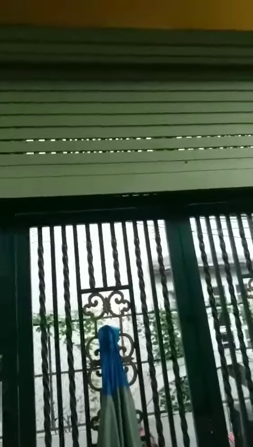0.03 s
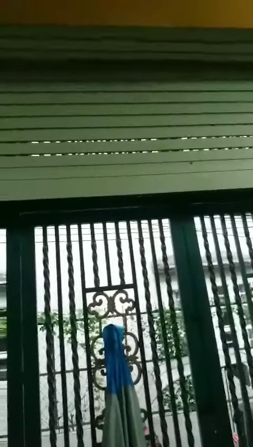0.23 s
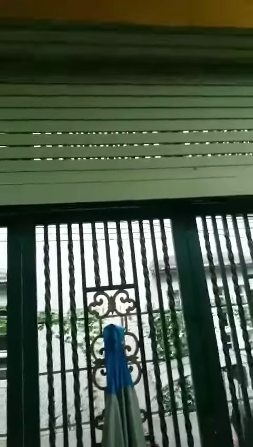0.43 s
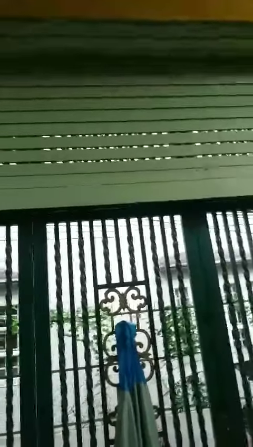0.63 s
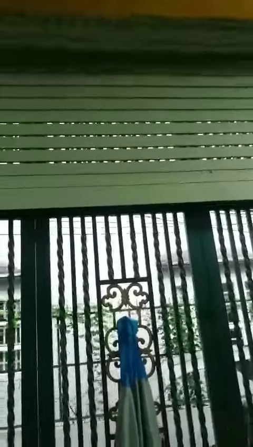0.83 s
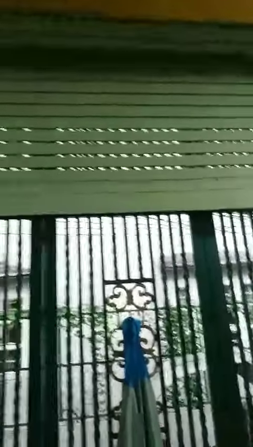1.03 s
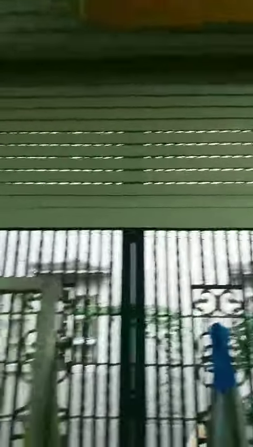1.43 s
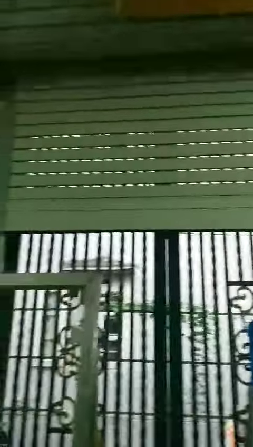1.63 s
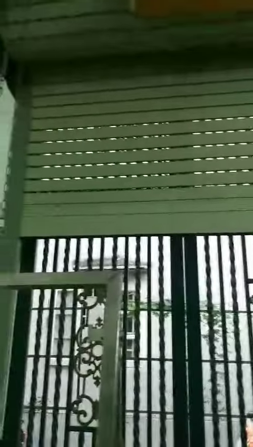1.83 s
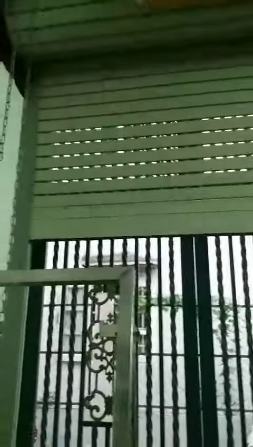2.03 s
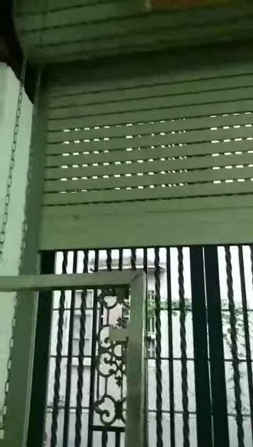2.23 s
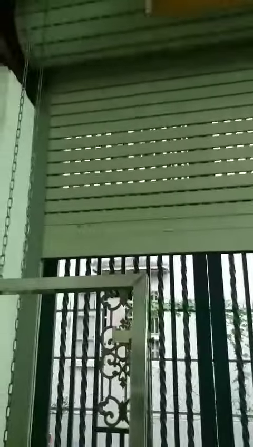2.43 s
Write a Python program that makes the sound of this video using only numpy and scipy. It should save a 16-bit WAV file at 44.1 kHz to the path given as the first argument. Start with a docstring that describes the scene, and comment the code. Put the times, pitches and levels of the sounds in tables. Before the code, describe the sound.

A motorized metal shutter clacks into motion and rattles upward over faint street traffic.

```python
"""A hard-walled entrance, heard on a closely spaced microphone pair near a metal roller shutter.
The motor drive engages with a loud clack that sets the steel ringing, and the shutter starts to rise.
The motor hums, loose metal chinks, and the slats knock and scrape ever louder in their guides,
so that the curtain booms and drones. A short room tail follows the hits.
Farther off, street noise comes in through the gate."""
import sys
import numpy as np
from scipy import signal
from scipy.fft import rfft, irfft
from scipy.io import wavfile
from scipy.ndimage import uniform_filter1d

SR = 44100
rng = np.random.default_rng(int(sys.argv[2]) if len(sys.argv) > 2 else 0)


def transcribe(signal):
    """Save signal, clipped to [-1, 1], as a 16-bit WAV file at the path in sys.argv[1]."""
    frames = np.atleast_2d(signal).T
    limited = np.clip(frames, -1, 1)
    pcm = np.round(limited * 32767).astype(np.int16)
    wavfile.write(sys.argv[1], SR, pcm)


N = 110250
TIME = np.arange(N) / SR

# the latch taps just before the drive engages: start_s, level_db
LATCH = [(.2294, -19.5)]
# spectrum of the tap: frequency_hz, density_db
LATCH_COLOUR = [(200, -14), (1500, -12), (2400, -4), (4100, 4), (5200, -12), (6500, -4), (9000, -21),
                (16000, -16)]
# blows of the drive engaging: start_s, level_db
BLOWS = [(.2418, -12), (.2485, -14), (.2555, -10), (.2645, -10.5), (.278, -11), (.287, -13.5),
         (.3015, -14.5)]
# spectrum of a blow: frequency_hz, density_db
BLOW_COLOUR = [(30, -50), (80, -42), (160, -14.5), (330, -14.5), (450, -14.5), (900, -12), (1650, -10.5),
               (1830, 1), (2090, -4), (2300, 0.5), (2700, -5), (3300, -9), (3750, -4.5), (4400, -6),
               (5000, -12), (7400, -12), (9800, -26.5), (14500, -24.5), (16000, -31)]
# ringing of the struck steel: pitch_hz, relative_db, t60_s
STEEL_MODES = [(952, -14.5, 0.42), (1537, -14, 0.56), (1806, -10, 0.19), (1816, -4, .24), (1913, -2, 0.26),
               (1954, -12, 0.25), (2217, -6, .18), (2262, 1, 0.15), (2340, -4, 0.21), (2383, -2.5, 0.23),
               (2803, -13, 0.26), (2855, -12, 0.52), (2947, -9, 0.29), (3720, -9, 0.33), (4180, -6, 0.22),
               (4330, -10, 0.22), (4360, -8.5, 0.46), (6160, -11, .3), (6970, -21, .28)]
# the curtain shudders under the blows: start_s, level_db
SHUDDER = [(.2555, -22), (.266, -28.5), (.287, -25.5)]
# spectrum of the shudder: frequency_hz, density_db
SHUDDER_COLOUR = [(60, -47), (150, -8), (260, -7), (340, 6), (450, -13), (650, -2.5), (1000, -12),
                  (2000, -13), (16000, -60)]
# loose parts rattle as they settle: start_s, level_db
RATTLES = [(.473, -31.5), (.512, -30.5)]
# spectrum of a rattle: frequency_hz, density_db
RATTLE_COLOUR = [(100, -21), (300, -5.5), (1300, -6), (1850, 1), (3500, 0), (4600, -3.5), (6000, -15),
                 (8600, -7), (10500, -19), (16000, -24)]
# ringing of those parts: pitch_hz, relative_db, t60_s
RATTLE_MODES = [(1825, -8, .25), (2370, -14, 0.21), (4520, -4, 0.15), (4800, -12, .35)]

# slats knock as they roll up: start_s, boom_db, boom_hz, clatter_db
KNOCKS = [(.52, -34.5, 202, -39.5), (1.256, -40, 183, -44), (1.291, -43.5, 183, -52),
          (1.325, -40.5, 186, -62), (1.364, -46, 183, -48), (1.484, -43, 200, -43), (1.56, -46, 192, -55),
          (1.637, -39, 193, -48), (1.6987, -32, 202, -43), (1.778, -35, 181, -37), (1.871, -40, 151, -40),
          (1.897, -34, 180, -51), (1.949, -32, 181, -38.5), (2.02, -28, 201, -33), (2.038, -36, 203, -34.5),
          (2.1083, -32, 199, -33), (2.134, -26.5, 189, -37), (2.183, -23, 192, -32.5),
          (2.207, -29, 201, -30), (2.237, -31, 207, -29.5), (2.299, -25.5, 213.4, -28),
          (2.314, -31, 217, -45), (2.34, -41, 217, -46), (2.391, -25, 210, -31), (2.459, -26, 215, -30),
          (2.483, -25, 215, -31.5)]
# spectrum of their clatter: frequency_hz, density_db
CLATTER_COLOUR = [(40, -36), (90, -31), (150, -7), (220, 9), (280, -7), (350, -3), (430, -3.5), (540, 7),
                  (800, -3.5), (1300, -1), (2200, -5.5), (4300, -18), (8000, -32), (16000, -45)]
# slats slide in the guides: time_s, level_db
SLIDE_LEVEL = [(0, -55), (1.3, -58), (1.42, -45.5), (1.52, -41), (1.64, -38), (1.87, -35.5), (2.05, -34.5),
               (2.16, -35.5), (2.22, -33.5), (2.28, -36.5), (2.35, -33.5), (2.43, -34.5), (2.5, -33.5)]
# spectrum of the friction: frequency_hz, density_db
SLIDE_COLOUR = [(25, -39), (50, -13), (75, -18), (115, -4), (172, -5.5), (215, -1), (280, -8.5),
                (360, -4.5), (430, -7.5), (700, -7.5), (1200, -9), (2000, -8), (3200, -10), (4400, -12.5),
                (6200, -18.5), (7900, -22.5), (8600, -18), (9600, -28), (16000, -31)]
# resonances of the sliding curtain: pitch_hz, relative_db
CURTAIN_MODES = [(172, -10), (214, -12), (345, -16), (368, -15.5), (438, -19), (521, -17), (590, -22),
                 (688, -19.5), (1203, -20.5)]
# slats catch on the guides: peak_s, level_db, width_s
SCRAPES = [(1.64, -37.5, 0.014), (1.881, -39, 0.019), (2.215, -41, 0.016), (2.348, -33, 0.017)]
# spectrum of a scrape: frequency_hz, density_db
SCRAPE_COLOUR = [(300, -16), (1000, -4), (2200, 1), (4200, 3), (6200, -7), (8600, -8), (10000, -22),
                 (16000, -26)]

# light ticks of the drive: start_s, level_db
TICKS = [(.5125, -44), (.8962, -38)]
# spectrum of a tick: frequency_hz, density_db
TICK_COLOUR = [(300, -30), (2500, -1), (4000, 2), (5500, 5), (9000, -4.5), (16000, -7)]
# chinks of loose metal: start_s, level_db, relative_ring_db
CHINKS = [(1.572, -37, -24), (1.579, -32.5, -20), (1.668, -34, -5), (1.677, -35.5, -4), (1.692, -41, -3)]
# spectrum of a chink: frequency_hz, density_db
CHINK_COLOUR = [(1000, -27), (5000, -2.5), (8500, 0.5), (12000, 4), (16000, 0)]
# ringing of the loose metal: pitch_hz, relative_db, t60_s
CHINK_MODES = [(10450, -2, .4), (10680, 0, 0.45), (10900, -8, .45), (11200, -6, .45), (11230, -8, .42)]
# mains hum of the motor: time_s, fundamental_db, octave_db
HUM_LEVEL = [(0, -54, -68.5), (.25, -56, -62), (.42, -61, -49), (.7, -66, -50), (1, -79, -51.5),
             (1.4, -62.5, -59), (2.5, -70, -52)]
# street noise through the gate: time_s, level_db
STREET_LEVEL = [(0, -41), (.07, -42.5), (.15, -39.5), (.22, -41.5), (.62, -41.5), (.83, -44), (1, -42),
                (1.15, -46), (1.35, -47), (2.5, -43.5)]
# spectrum of the street: frequency_hz, density_db
STREET_COLOUR = [(25, -31), (50, -5), (75, -22), (105, -3), (180, 2), (270, -2), (350, 2), (450, -4),
                 (620, 2), (800, -1.5), (1100, -1), (2000, -1.5), (3000, -3), (4500, -6), (6200, -11.5),
                 (8700, -14.5), (10000, -20.5), (16000, -21.5)]

# decay of the entrance: frequency_hz, t60_s
ROOM_DECAY = [(500, 0.64), (2200, 0.46), (12000, 0.47)]
# how alike the two microphones hear noise: frequency_hz, correlation
MIC_LIKENESS = [(60, 0.91), (200, 0.94), (400, 0.92), (800, 0.44), (2000, 0.23), (6000, 0.1), (16000, 0.2)]
# colour difference between the microphones: frequency_hz, left_minus_right_db
MIC_BALANCE = [(60, -3), (300, -3.5), (800, -3), (1300, -3.5), (2400, 0.5), (4400, 3.5), (6500, -0.5),
               (9000, 8.5), (12000, 2), (16000, -1)]
LEFT_LAG_S = .00018


def drive_clack(steel_db=-10, pan_db=0.4):
    """The drive engages: a tap, a volley of steel blows that shakes the curtain, two weak rattles."""
    tap = hits(LATCH, LATCH_COLOUR, t60_s=0.041, room_db=-9, grain_db=-1.5)
    blows = hits(BLOWS, BLOW_COLOUR, t60_s=0.079, room_db=-9.5, grain_db=1)
    steel = amp(steel_db) * ring(BLOWS, STEEL_MODES)
    shudder = hits(SHUDDER, SHUDDER_COLOUR, t60_s=0.13, room_db=-8.5, grain_db=3.5)
    rattles = hits(RATTLES, RATTLE_COLOUR, t60_s=0.16, room_db=-4.5, grain_db=1.5)
    rattles += ring(RATTLES, RATTLE_MODES)
    return (tap + blows + steel + shudder + rattles) * amp([[pan_db / 2], [-pan_db / 2]])


def slat_knocks(rise_s=0.0036, boom_t60_s=.11, boom_gain_db=3):
    """Each knock makes the curtain clatter and boom; the boom sits midway between the microphones."""
    booms, t = np.zeros((2, N)), TIME[:SR // 2]
    for start_s, boom_db, hz, _ in KNOCKS:
        envelope = (1 - np.exp(-t / rise_s)) * amp(boom_gain_db + boom_db - 60 * t / boom_t60_s)
        boom = envelope * np.sin(2 * np.pi * hz * t)
        add(booms, start_s, np.array([boom, boom]))
    clatters = [(s, db) for s, _, _, db in KNOCKS]
    return booms + hits(clatters, CLATTER_COLOUR, t60_s=0.15, room_db=-8.5, grain_db=3)


def guide_friction(mode_width_hz=9):
    """Steady friction in the guides sets the curtain droning; now and then a slat catches."""
    drone = 0
    for hz, db in CURTAIN_MODES:
        angle = 2 * np.pi * hz * TIME
        drone += amp(db) * (wander(mode_width_hz) * np.sin(angle) + wander(mode_width_hz) * np.cos(angle))
    sliding = (noise(SLIDE_COLOUR, grain_db=1.5) + drone) * level(SLIDE_LEVEL)
    catches = sum(amp(db) * np.exp(-((TIME - s) / width_s) ** 2 / 2) for s, db, width_s in SCRAPES)
    return sliding + catches * noise(SCRAPE_COLOUR, grain_db=1.5)


def loose_metal():
    """Light ticks and bright, ringing chinks as the slack is taken up."""
    ticks = hits(TICKS, TICK_COLOUR, t60_s=0.049, room_db=-3.5, grain_db=2)
    chinks = hits([(s, db) for s, db, _ in CHINKS], CHINK_COLOUR, t60_s=0.071, room_db=-3, grain_db=-3)
    ringing = ring([(s, db + ring_db) for s, db, ring_db in CHINKS], CHINK_MODES)
    return ticks + chinks + ringing


def motor(hum_hz=100.5, waver_rad=0.38, waver_db=3.5):
    """Wavering mains hum, whose octave takes over once the motor runs."""
    angle = 2 * np.pi * hum_hz * TIME + waver_rad * wander(rate_hz=7.9)
    hum = level(HUM_LEVEL, column=1) * np.sin(angle) + level(HUM_LEVEL, column=2) * np.sin(2 * angle)
    return np.sqrt(2) * hum * unit(amp(waver_db * wander(rate_hz=30)))


def street():
    """A steady wash of traffic from beyond the gate."""
    return noise(STREET_COLOUR) * level(STREET_LEVEL) * grain(depth_db=0.38, samples=600)


def hits(events, colour, t60_s, room_db, grain_db, room_build_s=0.0082):
    """Short rattling bursts, then the room's tail, which dies at its own speed in each band."""
    power = strikes(events) ** 2
    out = noise(colour, grain_db) * decay(power, t60_s)
    pole = np.exp(-1 / (room_build_s * SR))
    room_power = signal.lfilter([1 - pole], [1, -pole], power)
    wash, hz = rfft(noise(colour)), np.fft.rfftfreq(N, 1 / SR)
    centres_hz, room_t60s = np.transpose(ROOM_DECAY)
    for share, room_t60_s in zip(np.eye(len(room_t60s)), room_t60s):
        band = irfft(wash * np.interp(hz, centres_hz, share), N)
        out += amp(room_db) * band * decay(room_power, room_t60_s)
    return out


def ring(events, modes, wander_rad=.5):
    """Dying partials fed by every blow; their phase wanders, and differs between the microphones."""
    first = round(events[0][0] * SR)
    power = strikes(events)[first - 1:first + SR * 2 // 3] ** 2
    t, out = TIME[:len(power)], np.zeros((2, N))
    for hz, db, t60_s in modes:
        phase = 2 * np.pi * hz * t + wander_rad * wander(rate_hz=71.4)[:len(t)]
        lag_rad = 2 * np.pi * hz * LEFT_LAG_S / 4 + rng.uniform(0, 1)
        add(out, (first - 1) / SR, amp(db) * decay(power, t60_s) * np.sin([phase - lag_rad, phase]))
    return out


def noise(colour, grain_db=0):
    """Coloured noise of rms 1 at the microphone pair; grain makes it chatter."""
    hz = np.fft.rfftfreq(N, 1 / SR)
    common, separate = rfft(rng.standard_normal((2, N)) * grain(grain_db))
    likeness = np.clip(curve(MIC_LIKENESS, hz), 0, 1)
    left = common * np.exp(-2j * np.pi * hz * LEFT_LAG_S)
    right = likeness * common + np.sqrt(1 - likeness ** 2) * separate
    return unit(irfft(np.array([left, right]) * amp(curve(colour, hz)), N))


def grain(depth_db, samples=40):
    """Random gain that wavers over about this many samples."""
    return unit(amp(depth_db * unit(uniform_filter1d(rng.standard_normal(N), samples))))


def wander(rate_hz):
    """Random drift of rms 1 that turns about rate_hz times a second."""
    points = rng.standard_normal(2000)
    return unit(np.interp(TIME * rate_hz, np.arange(len(points)), points))


def strikes(events):
    """One impulse for each row of start_s, level_db."""
    out = np.zeros(N)
    for start_s, db in events:
        out[int(np.clip(round(start_s * SR), 0, N - 1))] += amp(db)
    return out


def decay(power, t60_s):
    """Amplitude envelope of power that dies away by 60 dB in t60_s."""
    return np.sqrt(signal.lfilter([1], [1, -np.exp(-np.log(1e6) / (t60_s * SR))], power))


def curve(points, hz):
    """Reads a table on a log-frequency axis."""
    points_hz, values = np.transpose(points)
    return np.interp(np.log(hz + 1), np.log(points_hz + 1), values)


def level(points, column=1):
    """Gain over time from a table's dB column."""
    columns = np.transpose(points)
    return amp(np.interp(TIME, columns[0], columns[column]))


def add(mix, start_s, sound):
    """Mixes a stereo sound in at start_s."""
    part = mix[:, max(round(start_s * SR), 0):][:, :sound.shape[1]]
    part += sound[:, :part.shape[1]]


def amp(db):
    """Decibels to gain."""
    return 10 ** (np.asarray(db) / 20)


def unit(x):
    """Scales to rms 1."""
    return x / np.sqrt(np.mean(x ** 2) + 1e-20)


def scene():
    """The shutter in front, the street behind it."""
    return drive_clack() + loose_metal() + guide_friction() + slat_knocks() + motor() + street()


def record(dry, limit_db=-10.5, limit_span_s=0.0039, ceiling=1.4, low_cut_hz=47, high_cut_hz=15980):
    """The microphones differ in colour; a fast limiter flattens the clack; filters trim both ends."""
    tilt_db = curve(MIC_BALANCE, np.fft.rfftfreq(N, 1 / SR)) / 2
    heard = irfft(rfft(dry) * amp([tilt_db, -tilt_db]), N)
    loudness = np.sqrt(abs(uniform_filter1d((heard ** 2).mean(0), round(limit_span_s * SR))))
    limited = heard / np.maximum(loudness / amp(limit_db), 1)
    rounded = ceiling * np.tanh(limited / ceiling)
    low_cut = signal.butter(3, low_cut_hz, "high", fs=SR, output="sos")
    high_cut = signal.firwin(511, high_cut_hz, window=("kaiser", 9), fs=SR)
    return signal.oaconvolve(signal.sosfilt(low_cut, rounded), high_cut[None], "same")


dry = scene()
out = record(dry)
transcribe(out)
```